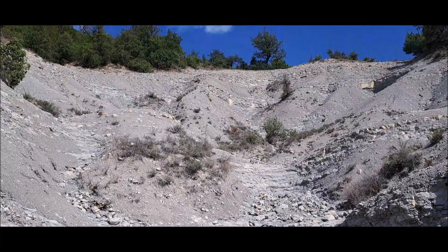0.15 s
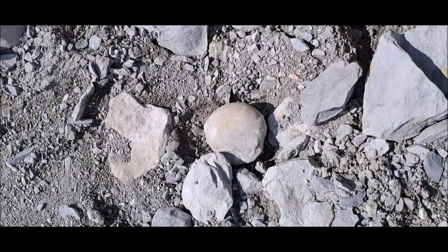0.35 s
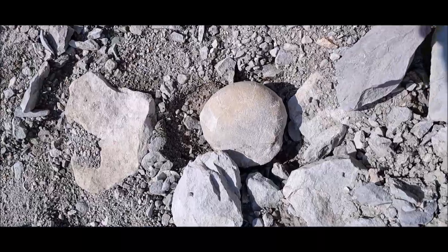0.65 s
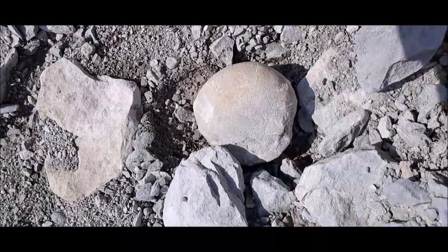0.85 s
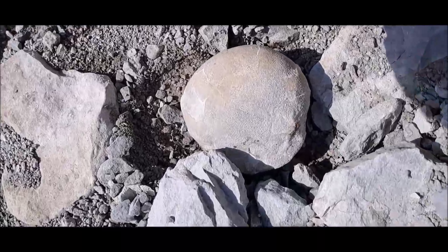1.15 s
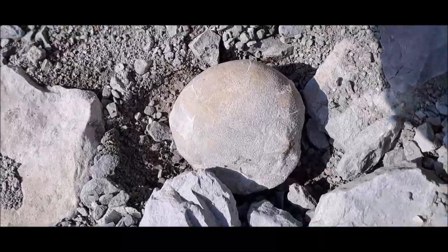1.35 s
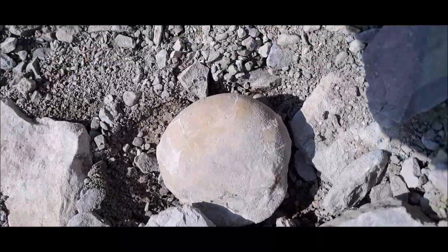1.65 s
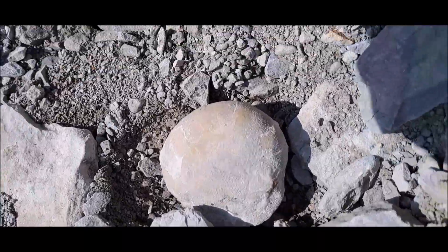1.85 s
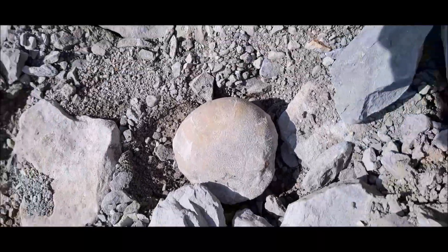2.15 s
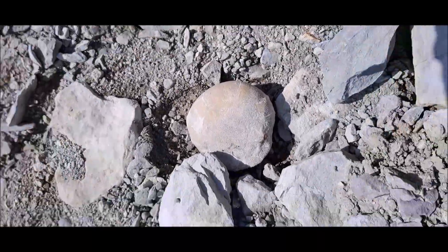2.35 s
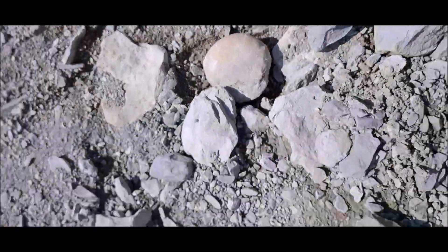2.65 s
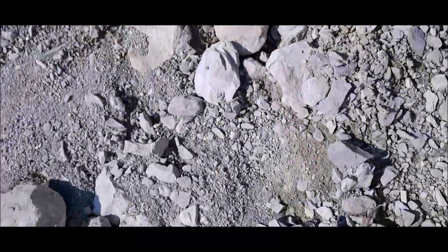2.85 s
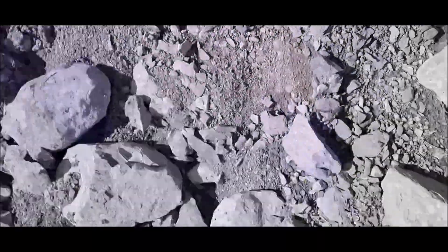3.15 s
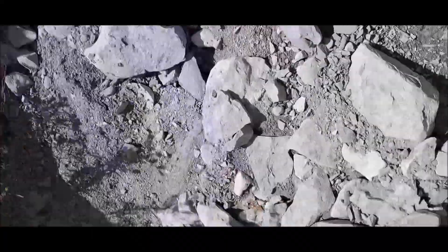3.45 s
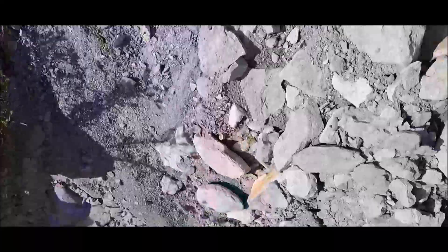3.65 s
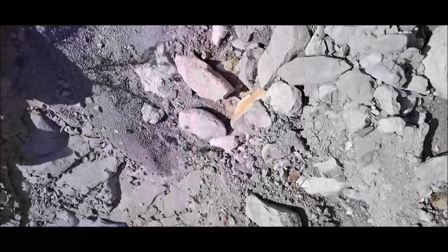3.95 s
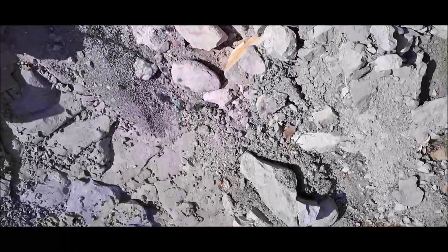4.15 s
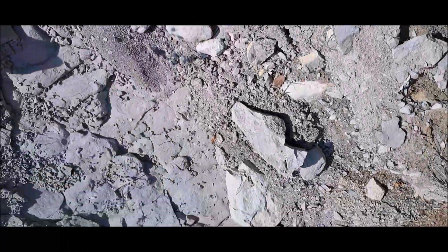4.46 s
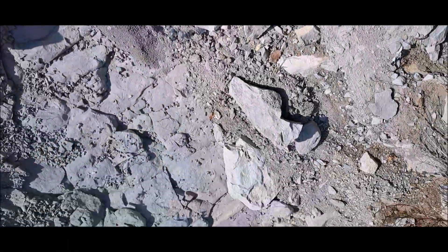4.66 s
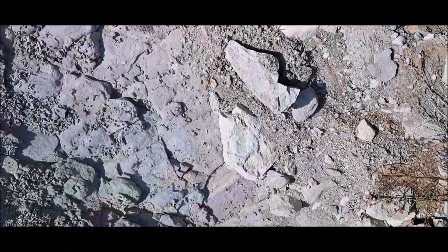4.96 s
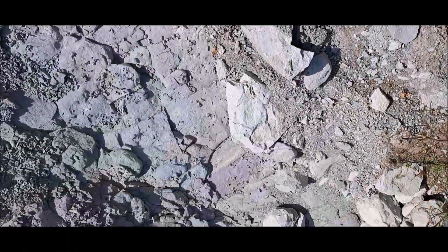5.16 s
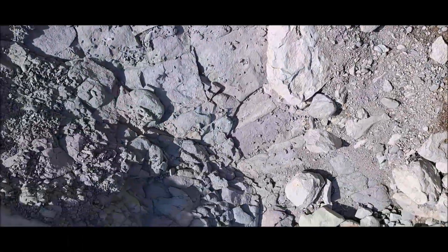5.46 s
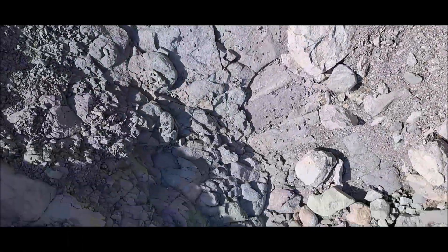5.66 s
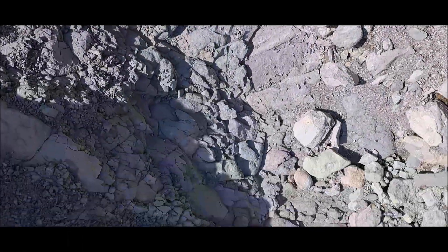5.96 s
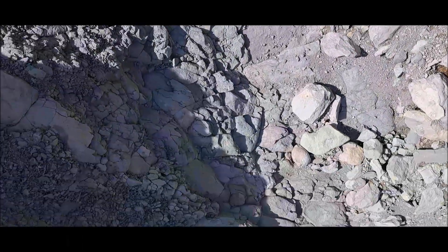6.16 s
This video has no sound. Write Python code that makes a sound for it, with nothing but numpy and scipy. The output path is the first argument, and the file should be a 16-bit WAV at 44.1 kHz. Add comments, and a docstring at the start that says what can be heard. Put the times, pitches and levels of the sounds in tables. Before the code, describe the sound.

Outdoors in a dry stony gully, a deep wind gust rumbles on the left, drops to silence for an instant, then continues lightly. A handheld microphone close to the walker catches a hollow stone knock and crunch, a quiet pause, then heavier gravel steps with sliding grit. Two larger stones clack sharply, one after the other over a second apart, among tiny pebble ticks.

```python
"""A gust rumbles at the left, the sound drops out for a tenth of a second, and a lighter wind goes on.
Someone picks a slow way over loose stones in a dry gully, camera in hand.
Soles crunch and drag, fine grit hisses, pebbles tick, and two larger stones clack sharply underfoot.
Stones are short filtered noise bursts, the two clacks add decaying sine modes; rubbing, cloth and wind
are coloured noise with random fractures, shaped by the gain of each movement or gust."""
import sys
import numpy as np
from scipy.fft import rfft, irfft, next_fast_len
from scipy.io import wavfile
from scipy.ndimage import map_coordinates

SR = 44100
rng = np.random.default_rng(int(sys.argv[2]) if len(sys.argv) > 2 else 0)


def unload_audio(sound):
    """Save the sound as a 16-bit wav file, at the path given as the first command line argument."""
    columns = np.transpose(np.atleast_2d(sound))
    # keep every value between -1 and 1, then stretch to whole-number steps
    steps = np.round(np.clip(columns, -1, 1) * 32767)
    wavfile.write(sys.argv[1], SR, steps.astype(np.int16))


N = 277830

# colour of a stone knocking on firmly bedded stone: frequency_hz, relative_level_db
SOLID_COLOUR = [(60, -25), (250, -6), (550, -6), (900, -7), (1400, 4.5), (2100, -6), (3500, -17),
                (5500, -28), (16000, -42.5)]


def amp(db):
    """Linear gain of a level in dB."""
    return 10 ** (np.asarray(db) / 20)


def unit(x):
    """The sound scaled to rms 1."""
    return x / np.sqrt(np.mean(x ** 2) + 1e-20)


def along(points, hz):
    """Read a curve of (Hz, value) points on a log frequency axis."""
    f, v = np.transpose(points)
    return np.interp(np.log(hz + 1), np.log(f + 1), v)


def wobble(rate):
    """A smooth random curve, rate knots a second."""
    knots = rng.standard_normal(int(N * rate / SR) + 4)
    return map_coordinates(knots, [np.arange(N) * rate / SR])


def pan(db):
    """Left and right gains of equal total power, left louder by db."""
    gains = amp(np.array([np.atleast_1d(db), -np.atleast_1d(db)]) / 2)
    return gains / np.sqrt(np.mean(gains ** 2, axis=0))


def coloured(x, gain_db):
    """Filter x causally (minimum phase, by way of the cepstrum) with a dB gain given over frequency."""
    m = 2 * next_fast_len(x.shape[-1] // 2 + 2048)
    gain = np.maximum(amp(gain_db(np.fft.rfftfreq(m, 1 / SR))), 1e-6)
    cepstrum = irfft(np.log(gain))
    # fold the cepstrum onto positive time
    cepstrum[1:m // 2] *= 2
    cepstrum[m // 2 + 1:] = 0
    response = np.exp(rfft(cepstrum))
    return irfft(rfft(x, m) * response)[..., :x.shape[-1]]


def pair(alike, size):
    """Two white noises that share a part: alike 0 is independent, 1 is mono."""
    a = np.clip(alike, 0, 1)
    shared = np.sqrt(a) * rng.standard_normal(size)
    return shared + np.sqrt(1 - a) * rng.standard_normal((2, size))


def crunch(spectrum, rate, grain, alike):
    """Stereo rubbing noise of rms 1, with about rate tiny fractures a second on top."""
    snaps = (rng.random(N) < rate / SR) * rng.standard_normal(N)
    snaps = snaps * amp(6.7 * rng.exponential(size=N).clip(0, 3))
    rubbing = pair(alike, N) + grain * unit(snaps)
    return unit(coloured(rubbing, lambda hz: along(spectrum, hz)))


def burst(gain_db, t60, blow, alike):
    """A blow and its dying rattle; the energy is that of 10 ms at rms 1."""
    t = np.arange(SR // 4) / SR
    x = pair(alike, len(t)) * amp(-60 * t / t60)
    x /= np.linalg.norm(x) / np.sqrt(2)
    x[:, 0] += blow  # the blow is one impulse
    return unit(coloured(x, gain_db)) * np.sqrt(.01 * SR / len(t))


def add(out, s, sound):
    """Mix a sound in at time s."""
    room = out[:, round(s * SR):]
    room[:, :sound.shape[1]] += sound[:, :room.shape[1]]


def left_late(x, ms):
    """A sound from the right reaches the left port later."""
    n = np.arange(x.shape[1])
    return np.array([map_coordinates(x[0], [n - ms * SR / 1000]), x[1]])


def stroke(s, hold, db, rise, release):
    """Gain of one movement: it rises, holds from time s and dies away, 20 dB per rise or release time."""
    t = np.arange(N) / SR - s
    return amp(db - 20 * np.maximum(-t / rise, 0) - 20 * np.maximum((t - hold) / release, 0))


def swells(rows):
    """Joint gain of movements that peak and let go at once."""
    return np.sqrt(sum(stroke(s, 0, db, rise, release) ** 2 for s, db, rise, release in rows))


def soles():
    """Weight crunches the gravel; dragging rasps it and sets sand and fine grit sliding."""
    # weight coming onto a sole: peak_s, level_db, rise_s, release_s (per 20 dB),
    # slip_rasp_db, stirred_sand_db (both relative to level_db)
    presses = [(0.973, -60.5, .13, 0.082, -7, 3), (3.168, -70, .07, 0.13, -10, 9),
               (3.829, -57.5, 0.042, .09, -10, -5), (4.04, -66, 0.31, .18, -11.5, -12.5),
               (4.243, -56.5, .1, 0.094, -8, -4), (5.235, -51.5, 0.042, .065, -4.5, -10),
               (5.55, -66.5, .45, 0.21, -7, -2.5)]
    # a sole dragging over the ground: start_s, length_s, level_db
    drags = [(0.887, 0.023, -71.5), (3.867, 0.37, -80.5), (4.276, .36, -70.5), (5.409, 0.22, -68),
             (5.8, 0.204, -81.5)]
    # runs of loosened grit: peak_s, level_db, rise_s, release_s (per 20 dB)
    pours = [(.97, -70, .1, 0.13), (3.25, -70.5, 0.19, .9), (3.77, -63, .38, 0.2), (3.98, -65, 0.14, .22),
             (4.56, -56, 0.46, 0.3), (5.3, -78.5, 0.73, .9), (5.73, -67.5, .06, 0.16),
             (6.28, -77.5, .3, .2)]
    # soft background rustle: time_s, level_db
    rustle_curve = [(0, -74.5), (.3, -85.5), (.85, -80.5), (1.3, -89), (2.1, -90.5), (2.45, -81.5),
                    (4.5, -85), (4.9, -88.5), (5.7, -78.5), (6.3, -80)]
    # colours of crunching gravel, rasping sole, fine grit and sand: frequency_hz, relative_level_db
    gravel_colour = [(100, -13.5), (220, -1), (330, -7), (490, 2.5), (750, -4.5), (1150, -5), (1750, -9.5),
                     (2300, -18), (3100, -15), (4000, -26.5), (8000, -28), (16000, -32)]
    sole_colour = [(150, -20), (500, -13.5), (850, -5.5), (1300, 1), (1750, -3.5), (2400, -12.5),
                   (4000, -24), (8000, -45)]
    fines_colour = [(3000, -35), (6500, -13.5), (8000, -12), (9500, -4.5), (11300, -2), (12500, -1),
                    (13800, -8), (16000, -13)]
    sand_colour = [(1500, -11.5), (2700, -5), (3700, -5), (5000, -1.5), (7000, -4), (9000, -10.5),
                   (12000, -35.5)]
    drag_attack_s, drag_release_s = 0.03, 0.2  # per 20 dB
    sand_drag_db, sand_grit_db = -6, -4  # how much dragging and running grit stir the sand
    sand_reference_db, sand_growth = -68.5, .55  # the rustle grows more slowly than the effort
    rustle_fines_db = -2.5  # fine grit in the background rustle

    weight = swells([(s, db, rise, release) for s, db, rise, release, _, _ in presses])
    slipping = swells([(s, db + rasp, rise, release) for s, db, rise, release, rasp, _ in presses])
    squeezed = swells([(s, db + sand, rise, release) for s, db, rise, release, _, sand in presses])
    strokes = [stroke(s, length, db, drag_attack_s, drag_release_s) for s, length, db in drags]
    dragging = np.max(strokes, axis=0)
    flow = swells(pours)
    rustle_s, rustle_db = np.transpose(rustle_curve)
    rustle = amp(np.interp(np.arange(N) / SR, rustle_s, rustle_db))

    effort = squeezed + amp(sand_drag_db) * dragging + amp(sand_grit_db) * flow
    stirred = amp(-73.5) * (effort / amp(sand_reference_db)) ** sand_growth

    press = weight * amp(1.2 * wobble(90))
    press = press * crunch(gravel_colour, rate=950, grain=0.45, alike=.75)
    drag = np.hypot(dragging, slipping) * amp(1.5 * wobble(55))
    drag = drag * crunch(sole_colour, rate=600, grain=0.72, alike=.6) * pan(-2.5)
    fines = np.hypot(flow, amp(rustle_fines_db) * rustle) * amp(1.2 * wobble(40))
    fines = fines * crunch(fines_colour, rate=2500, grain=.7, alike=.3) * pan(2.2)
    sand = np.hypot(stirred, rustle)
    sand = sand * crunch(sand_colour, rate=610, grain=0.27, alike=0.18) * pan(-2)
    return press + drag + fines + sand


def stone(modes, rattle, ring_db, crack_db, rattle_db, rattle_t60, settle_db, settle_t60, attack):
    """Stone on stone: a crack, a few short modes, crushed grit and a duller tail of settling gravel."""
    t = np.arange(SR // 4) / SR
    ring = np.zeros((2, len(t)))
    for k, (hz, db, t60, side) in enumerate(modes):
        # neighbouring modes start with opposite signs
        ring += (-1) ** k * pan(side) * amp(db - 60 * t / t60) * np.sin(2 * np.pi * hz * t)
    bright = lambda hz: along(rattle, hz) + 5 * np.log2(hz / 1000 + .3)
    dull = lambda hz: along(rattle, hz) - 5 * np.log2(hz / 1000 + 0.14)
    crack = amp(crack_db) * burst(bright, 0.0077, 0.068, .6)
    grit = amp(rattle_db) * burst(lambda hz: along(rattle, hz), rattle_t60, 0, .5)
    settle = amp(settle_db) * burst(dull, settle_t60, 0, 0.7)
    return (amp(ring_db) * ring + grit) * (1 - np.exp(-t / attack)) + crack + settle


def clacks():
    """A block tips over; later a slab snaps down. Each strikes again a moment after landing."""
    # modes of a heavy block and of a thin slab:
    # pitch_hz, relative_level_db, t60_s, left_over_right_db
    block_modes = [(555, -48, 0.19, -0.5), (650, -42.5, .1, 1), (823, -38.5, 0.12, 0), (1246, -27, 0.08, 5),
                   (1493, -36.5, 0.1, 4.5), (1643, -34, 0.076, 3), (1827, -34, 0.054, 3.5),
                   (2353, -31, .05, 0.5), (2454, -29, 0.055, 1), (2680, -35.5, 0.026, 2),
                   (3025, -30, .05, -1.5), (3434, -27, .05, 1.5), (3890, -33, 0.028, 4.5),
                   (4600, -38.5, .04, 0.5), (5920, -35.5, .035, 0), (6560, -22.5, 0.011, 7.5)]
    slab_modes = [(748, -39.5, 0.076, -4), (945, -27.5, 0.041, -6), (1205, -33, 0.033, 2.5),
                  (1497, -21, 0.039, 1), (1607, -21.5, .035, -2.5), (2039, -12, 0.037, 8.5),
                  (2200, -8.5, 0.032, 12), (2270, -14, 0.06, 4.5), (2770, -27, 0.017, -1.5),
                  (3385, -12.5, 0.0085, 7.5), (3950, -15.5, .022, 5.5), (4410, -23, 0.022, 7.5),
                  (5250, -35, .012, 1.5), (6980, -21, .012, 6.5)]
    # colours of their rattle: frequency_hz, relative_level_db
    block_colour = [(60, -19), (200, -10), (500, -11), (1000, -11.5), (1500, 5), (3000, 3), (5000, -5),
                    (6700, -12.5), (8000, -14.5), (10000, -12), (13000, -24), (16000, -38)]
    slab_colour = [(60, -33), (200, -20.5), (550, -20.5), (950, -8.5), (2200, 4), (4200, 0.5),
                   (5800, -21.5), (7000, -13), (8200, -33.5), (10200, -21), (13000, -36.5), (16000, -50.5)]
    out = np.zeros((2, N))

    block = stone(block_modes, block_colour, ring_db=4.0, crack_db=-30.5, rattle_db=-26.5,
                  rattle_t60=0.066, settle_db=-41.5, settle_t60=0.14, attack=0.0022)
    add(out, 4.1359, left_late(block, ms=0.15))
    add(out, 4.1425, amp(-29.5) * burst(lambda hz: along(SOLID_COLOUR, hz), 0.061, 0.11, 0.49))

    slab = stone(slab_modes, slab_colour, ring_db=0.0, crack_db=-25.5, rattle_db=-25,
                 rattle_t60=0.025, settle_db=-39.5, settle_t60=0.16, attack=.0006)
    add(out, 5.5342, left_late(slab, ms=.22))
    add(out, 5.5408, amp(-31.5) * burst(lambda hz: along(slab_colour, hz), 0.03, .5, 1.0))
    return out


def knocks():
    """Bedded stones rock against their neighbours; those over a gap sound hollow."""
    # knocks: start_s, level_db, hollowness (0-1), brightness_db_per_octave
    knock_rows = [(.912, -50.5, .8, 3), (.9525, -36, 0.96, -1), (.977, -58, .9, -4.5),
                  (.9985, -43.5, .9, 3), (3.813, -54.5, .2, -11.5), (3.834, -57, 0.6, -6),
                  (3.847, -57, 0.55, -7), (4.03, -58.5, .1, -9.5), (4.083, -62.5, .1, -6.5),
                  (4.221, -60.5, .1, -2.5), (4.241, -44.5, 0.07, -1), (4.257, -43.5, 0.03, 4),
                  (4.343, -65.5, 0, 2), (4.387, -62.5, 0, 0), (5.214, -59.5, .2, -3.5),
                  (5.383, -65, 0, -7.5)]
    # colour of a stone over a gap: frequency_hz, relative_level_db
    hollow_colour = [(60, 2), (300, -9), (550, 1.5), (830, 3.5), (1080, -1), (1300, 11), (1600, -14),
                     (1950, -12), (2750, 0.5), (3400, -12.5), (4400, -7), (6000, -31), (8300, -33),
                     (9500, -26), (16000, -47)]
    out = np.zeros((2, N))
    for s, db, hollow, bright in knock_rows:
        h = np.clip(hollow, 0, 1)

        def colour(hz):
            tilt = bright * np.log2(np.clip(hz, 120, 6000) / 1000)
            return h * along(hollow_colour, hz) + (1 - h) * along(SOLID_COLOUR, hz) + tilt

        knock = burst(colour, .014 + 0.016 * h, 1.6, 0.43)
        add(out, s, amp(db) * left_late(knock, ms=0.095 + 0.29 * h))
    return out


def pebbles():
    """Each pebble clicks as a short noise burst in one broad band around its own pitch."""
    # clicks: start_s, level_db, pitch_hz, width_octaves, t60_s
    clicks = [(0.447, -70.5, 3000, 2.3, .024), (.838, -56.5, 1960, 0.51, 0.13),
              (0.8374, -63, 3930, 2, 0.029), (.912, -63, 9200, 0.47, 0.0087),
              (0.952, -57, 9800, 0.25, .009), (1.009, -65, 11500, .5, .01), (1.447, -71, 2940, 1.7, 0.073),
              (1.8795, -58, 12500, 0.83, 0.028), (1.921, -65, 12500, 0.61, .018),
              (1.9457, -62, 12000, 0.73, .015), (1.991, -66, 12600, .31, .03),
              (3.6478, -55.5, 11200, 0.53, .025), (3.823, -62, 11950, .54, .016),
              (3.962, -56.5, 11000, 0.66, .03), (4.003, -61, 11000, 0.55, .012),
              (4.4474, -55.5, 10700, .4, .012), (4.8, -65.5, 11000, .6, .023),
              (5.6022, -56.5, 4200, 0.34, .008), (5.647, -65, 6017, 0.73, 0.023),
              (5.71, -60, 10950, .5, 0.076), (5.754, -62.5, 7970, .8, .017)]
    out = np.zeros((2, N))
    for s, db, pitch, width, t60 in clicks:
        band = lambda hz: -14 * np.log1p((np.log2((hz + 1) / pitch) / width) ** 2 / 2)
        add(out, s, amp(db) * burst(band, t60, 0.87, .6))
    return out


def thuds():
    """The soil under a loaded stone answers with a short low push."""
    # weight landing on the soil: start_s, level_db, pitch_hz, t60_s
    landings = [(0.951, -50.5, 85, .08), (1.408, -52.5, 65, .12), (1.875, -48.5, 55, .12),
                (3.814, -51, 210, 0.21), (4.146, -52, 260, 0.079), (5.546, -48.5, 210.8, .09)]
    out = np.zeros((2, N))
    for s, db, pitch, t60 in landings:
        band = lambda hz: -22 * np.log1p(0.67 * np.log2((hz + 1) / pitch) ** 2)
        add(out, s, amp(db) * burst(band, t60, 0, 0.9))
    return out


def cloth():
    """Trouser legs brush: cloth on cloth gives noise in a narrow, high band."""
    # swishes: peak_s, level_db, rise_s, release_s (per 20 dB)
    swishes = [(1.935, -68, 0.068, 0.12), (3.16, -69, .11, 0.32), (5.12, -70.5, 0.17, 0.5)]
    band = [(4000, -45.5), (9500, -18.5), (11500, -9), (12600, -4), (13700, -11), (16000, -23)]
    brushing = crunch(band, rate=990, grain=.6, alike=.3)
    return swells(swishes) * amp(1.5 * wobble(50)) * brushing * pan(2)


def wind():
    """Eddies buffet the ports partly independently, over a faint even hiss; the first gust is deepest."""
    # gusts: peak_s, level_db, rise_s, release_s (per 20 dB), pitch_ratio (to the rumble colour)
    gusts = [(0.029, -30.5, 0.73, .18, 0.88), (.5, -57, 0.5, 0.27, 1.13), (2.2, -64, 1.1, 0.32, 1.16),
             (3.9, -55.5, 1.36, 2, 1), (5.6, -63.5, 1.3, 0.99, 0.92)]
    # colours of the buffeting and of the hiss: frequency_hz, relative_level_db
    rumble_colour = [(15, -14), (30, -12.5), (55, -1), (72, -1), (105, -7.5), (150, -21.5), (200, -27.5),
                     (400, -41), (900, -54.5), (4000, -70.5), (16000, -89.5)]
    air_colour = [(80, 9), (140, 21.5), (200, 11), (270, 10), (400, 2), (700, -0.5), (1500, 1), (2800, -3),
                  (5000, -4), (8000, -9), (12000, -4), (16000, -8)]
    breeze_db = -64.5  # the steady breeze between gusts

    def eddies(pitch):
        shifted = [(hz * pitch, db) for hz, db in rumble_colour]
        return crunch(shifted, rate=40, grain=0.065, alike=0.55)

    flow = amp(breeze_db) * eddies(0.99)
    for s, db, rise, release, pitch in gusts:
        flow = flow + stroke(s, 0, db, rise, release) * eddies(pitch)
    lumps = unit(amp(1.1 * np.array([wobble(8), wobble(8)]) + 1.2 * wobble(9.8)))
    # the first gust comes from the left, the rest lean right
    side_s, side_db = [.07, .12, .5, 1.4, 2.2, 3.3], [15, 3, -2.5, -5.0, -4, -3.5]
    side = pan(np.interp(np.arange(N) / SR, side_s, side_db))
    hiss = unit(coloured(pair(0.29, N), lambda hz: along(air_colour, hz)))
    return flow * lumps * side + amp(-75.5) * hiss * pan(-.8)


def scene():
    """The hand and the camera body colour the ground's sound differently at each port."""
    # balance of the ground's sound at the ports: frequency_hz, left_over_right_db
    port_balance = [(200, -5.5), (900, -4.5), (1600, -8.5), (2200, 0), (3200, 6.5), (4800, 0), (7000, 1.5),
                    (10500, 18.5), (13000, 13), (16000, 7.5)]
    left, right = clacks() + thuds() + knocks() + pebbles() + soles() + cloth()
    port_db = lambda hz: 20 * np.log10(pan(along(port_balance, hz)))
    left = coloured(left, lambda hz: port_db(hz)[0])
    right = coloured(right, lambda hz: port_db(hz)[1])
    return np.array([left, right]) + wind()


def record(dry):
    """The sound cuts out with a click for a tenth of a second; nothing passes above the band limit."""
    cut_s, cut_db, cut_hz = .249, -64.5, 770  # the click and the corner of its low-pass colour
    top_hz = 15950
    cut = dry * np.interp(np.arange(N) / SR, [.249, .252, .354, .36], [1, .01, .01, 1])
    low_pass = lambda hz: -10 * np.log10(1 + (hz / cut_hz) ** 2)
    add(cut, cut_s, amp(cut_db) * burst(low_pass, .002, 3, .9))
    m = next_fast_len(N + SR // 4)
    passed = np.fft.rfftfreq(m, 1 / SR) < top_hz
    return irfft(rfft(cut, m) * passed, m)[:, :N]


dry = scene()
out = record(dry)
unload_audio(out)
```